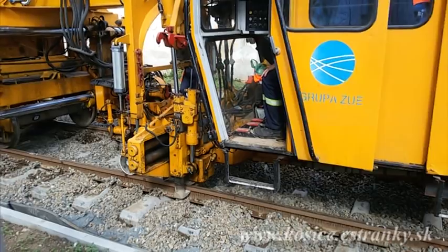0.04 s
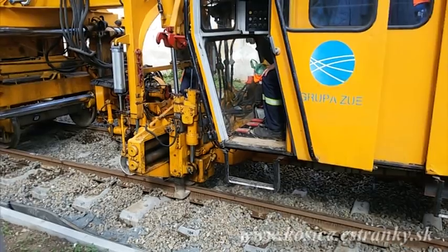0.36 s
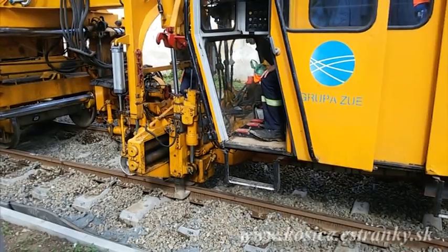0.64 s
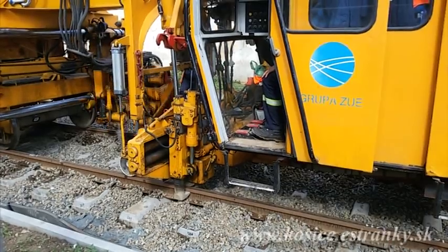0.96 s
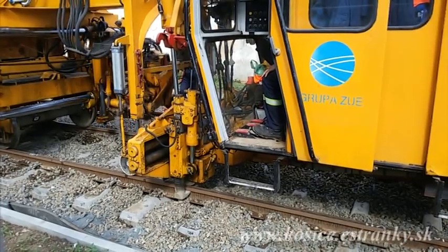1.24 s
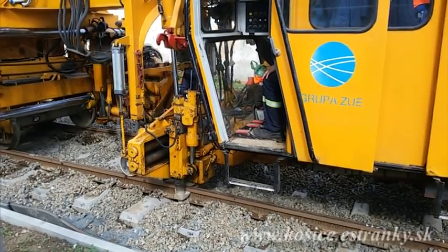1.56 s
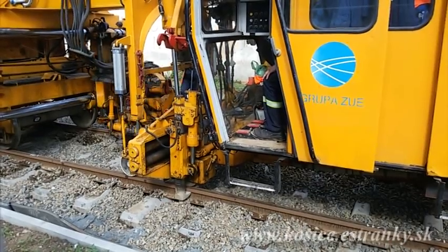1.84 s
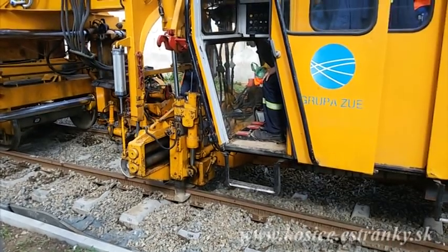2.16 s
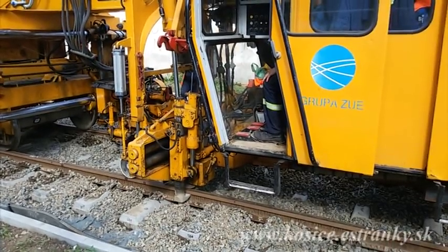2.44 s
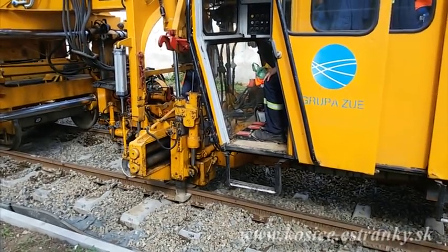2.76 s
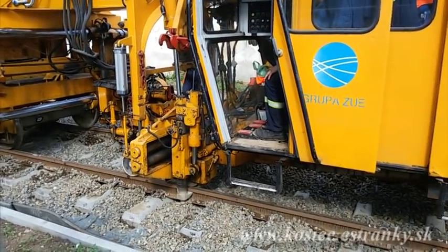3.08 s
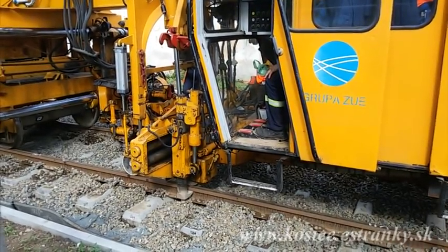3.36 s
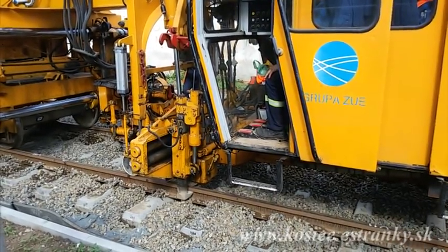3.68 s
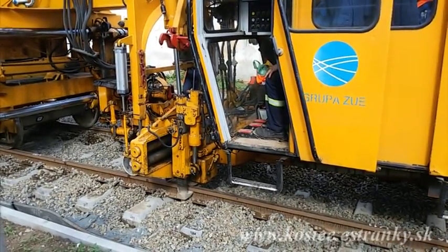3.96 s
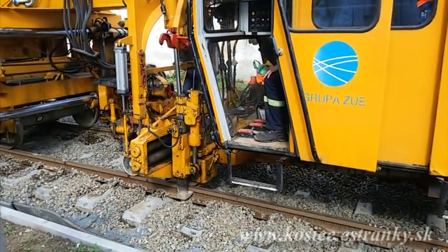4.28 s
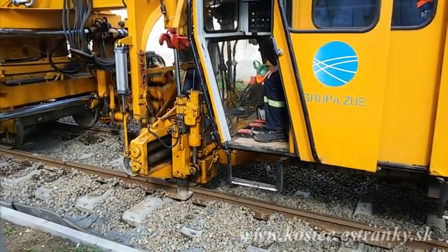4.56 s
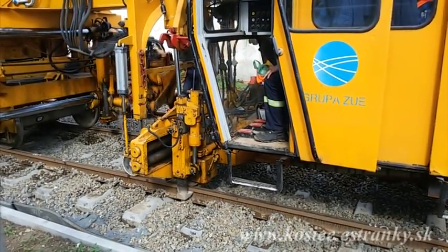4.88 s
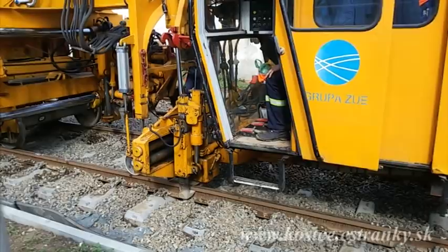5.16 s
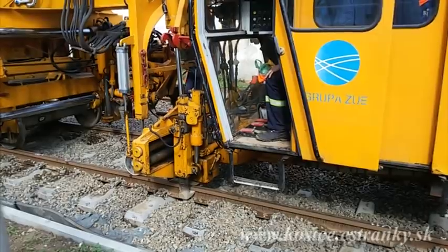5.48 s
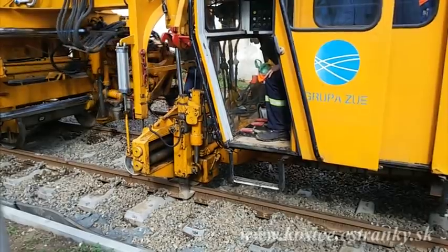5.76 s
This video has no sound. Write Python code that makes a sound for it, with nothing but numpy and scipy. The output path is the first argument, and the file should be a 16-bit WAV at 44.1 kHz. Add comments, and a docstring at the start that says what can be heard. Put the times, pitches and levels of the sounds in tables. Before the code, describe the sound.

A diesel engine drones and rattles without a break, heard from close by on open railway track. Twice the machine drives its shaking tines into the stone bed with a gritty thud, followed by churning gravel, steel scraping, fast metallic chatter and a pump whine as the engine sags slightly. Between the two digs come a low vibrating hum and a rush of hissing oil with a faint whistle.

```python
"""Open railway track, close beside a working ballast tamper; the sound fades in.
The diesel drones at governed speed and sags when the hydraulic pump takes load and whines.
Lifted clear, the vibrating tines hum; twice they plunge in with a thud, then crunch and scrape
through the stones. Loose linkage clinks with every shake, the heavy frame rumbles, and oil hisses
in the valves, most strongly as it drives the unit on to the next sleeper."""
import sys
import numpy as np
from scipy import signal
from scipy.fft import rfft, irfft
from scipy.io import wavfile

SR = 44100
rng = np.random.default_rng(int(sys.argv[2]) if len(sys.argv) > 2 else 0)


def store_wav(level_fs):
    """Save 16-bit WAV to argv[1]."""
    pcm = np.round(np.clip(np.atleast_2d(level_fs), -1, 1) * 32767)
    wavfile.write(sys.argv[1], SR, pcm.T.astype(np.int16))


N = 265482
T = np.arange(N) / SR

# the tines are down in the stone bed: plunge_s, clear_s, thud_db
DIGS = [(0.713, 2.43, -18), (4.30, 6.75, -19)]


def amp(db):
    """Decibels to gain."""
    return 10 ** (np.asarray(db) / 20)


def unit(x):
    """Scales to rms 1."""
    return x / np.sqrt(np.mean(x ** 2) + 1e-20)


def curve(rows):
    """An automation curve through (time, value) points."""
    return np.interp(T, *np.transpose(rows))


def drift(hz):
    """A slow random wander of rms 1, up to about hz."""
    f = np.fft.rfftfreq(N, 1 / SR)
    return unit(irfft(rfft(rng.standard_normal(N)) * np.exp(-(f / hz) ** 2), N))


def colour(x, spectrum, size=4096):
    """Minimum-phase EQ, so that clicks keep their attack; the result has rms 1."""
    hz, db = np.transpose(spectrum)
    f = abs(np.fft.fftfreq(size, 1 / SR))
    log_gain = np.log(amp(np.interp(np.log(f + 1), np.log(hz), db)))
    taps = np.fft.ifft(np.exp(signal.hilbert(log_gain).conj())).real
    return unit(signal.oaconvolve(x, taps)[:N])


def tones(turns, orders, waver, waver_hz):
    """Partials at multiples of a rotation, each wavering in strength and phase."""
    return sum(amp(db) * np.sqrt(2) * (1 + waver * drift(waver_hz))
               * np.cos(2 * np.pi * (k * turns + rng.random()) + waver * drift(waver_hz))
               for k, db in orders)


def strokes(turns, length, depth):
    """A gain that jumps once a turn and dies away within a share of it."""
    return unit(1 + depth * np.exp(-(turns % 1) / length))


def knocks(per_s, spread_db):
    """Random clicks, mostly small and a few large."""
    size = amp(spread_db * np.minimum(rng.exponential(1, N), 4))
    return unit(size * rng.choice([-1., 1.], N) * (rng.random(N) < per_s / SR))


def jolts(per_s, fade_s, depth):
    """A gain of irregular jumps, each settling back to 1."""
    hits = rng.exponential(1, N) * (rng.random(N) < per_s / SR)
    return 1 + depth * signal.lfilter([1], [1, -np.exp(-1 / (fade_s * SR))], hits)


def arch(start_s, end_s, skew=1):
    """A half-sine swell; a skew below 1 brings its peak forward."""
    return np.sin(np.pi * np.clip((T - start_s) / (end_s - start_s), 0, 1) ** skew)


def stage(rows, attack_s, release_s):
    """A stage of the work cycle: its gate (0-1), and a gated ramp from its start to its end."""
    on, ramp = np.zeros(N), np.zeros(N)
    for start, end, *_ in rows:
        gate = np.clip(np.minimum((T - start) / attack_s, (end - T) / release_s), 0, 1)
        on += gate
        ramp += gate * (T - start) / (end - start)
    return on, ramp


def exhaust(firings, level_db, pressure, swell_db=2.5):
    """The firing note swells with pump pressure, over side tones from cylinders of unequal strength."""
    # side tones: firing_multiple, level_db
    side_orders = [(0.75, -21.5), (1.25, -21), (1.75, -14), (2, -5.5), (2.25, -26.5), (2.75, -15),
                   (3, -16.5), (3.75, -14), (4, -18.5)]
    note = amp(swell_db * pressure) * tones(firings, [(1, 0.0046)], waver=0.039, waver_hz=14)
    sides = tones(firings, side_orders, waver=0.07, waver_hz=5)
    return amp(level_db) * (note + sides)


def engine_rattle(firings, level_db, cylinders=4):
    """Each firing jolts the block; one of the cylinders knocks harder, and loose parts tick."""
    # tone of the engine block: freq_hz, gain_db
    block_eq = [(300, -24.5), (700, -15.5), (1500, -2.5), (2300, -3), (2900, 0.5), (3500, 0.5),
                (3900, -5.5), (4350, -2.5), (4800, -12), (7000, -21), (11000, -54)]
    pulse = strokes(firings, length=.3, depth=0.13)
    pulse *= strokes(firings / cylinders, length=0.13, depth=0.074)
    pulse *= jolts(per_s=110, fade_s=0.0054, depth=0.24)
    return amp(level_db) * colour(pulse * knocks(per_s=20000, spread_db=1.5), block_eq)


def valve_gear(firings, level_db, cylinders=4, size=2048):
    """Valves and injectors repeat the same ticks every engine cycle, giving the roar a fine buzz."""
    # tone of the valve gear: freq_hz, gain_db
    valve_eq = [(150, -25), (280, -9), (400, -11.5), (500, -13), (600, -10.5), (700, -2), (1000, -5.5),
                (1300, -4.5), (1700, 3), (1900, -5.5), (2400, -13), (4000, -12), (7000, -35)]
    phase = np.arange(size) / size
    pattern = rng.standard_normal(size) * strokes(cylinders * phase, length=0.22, depth=1.1)
    ticks = np.interp(firings / cylinders, phase, pattern, period=1)
    return amp(level_db) * colour(ticks, valve_eq)


def oil_hiss(firings, level_db, cylinders=4):
    """Oil rushes through the valves, pulsing slightly with the engine."""
    # tone of the rushing oil: freq_hz, gain_db
    oil_eq = [(2000, -16.5), (4000, -0.5), (4900, -3), (5450, 2.5), (6100, -4.5), (7000, -9.5), (7800, -10),
              (8400, -13.5), (9200, -18.5), (10200, -21.5)]
    pulse = strokes(firings, length=.3, depth=0.057)
    pulse *= strokes(firings / cylinders, length=0.52, depth=0.29)
    flow = rng.standard_normal(N) * pulse * jolts(per_s=120, fade_s=0.017, depth=0.12)
    return amp(level_db) * colour(flow, oil_eq)


def valve_whistles(width_hz=44):
    """Narrow, fuzzy bands of hiss swell and fade as the oil valves open and close."""
    # valve openings: start_s, end_s, pitch_hz, level_db
    whistles = [(0.3, 0.85, 4300, -32), (1.306, 2.2, 3260, -31), (3.5, 4.45, 4330, -31.5)]
    out = np.zeros(N)
    for start, end, hz, db in whistles:
        angle = 2 * np.pi * hz * T
        band = drift(width_hz) * np.cos(angle) + drift(width_hz) * np.sin(angle)
        out += amp(db) * arch(start, end) * band
    return out


def tine_hum(shakes, free_db, churn_db, damping=0.99):
    """The arms hum when free; any touch of the ballast damps them, and higher tones rise in the frame."""
    # partials swinging free, and pressed into the stones: shake_multiple, level_db
    free_orders = [(3, -10), (4, 3), (5, -4), (6, -14.5), (7, -10), (9, -21)]
    pressed_orders = [(2, -16), (6, -11.5), (8, -10), (9, -6), (10, -6.5), (12, -8), (13, -5), (17, -11.5),
                      (21, -8)]
    touching, _ = stage(DIGS, attack_s=0.094, release_s=0.42)
    free = amp(free_db) * tones(shakes, free_orders, waver=0.12, waver_hz=4.6)
    pressed = amp(churn_db - 15) * tones(shakes, pressed_orders, waver=0.41, waver_hz=6.1)
    return (1 - damping * touching) * free + pressed


def frame_rumble(shakes, level_db):
    """Dull blows travel into the heavy frame with each shake."""
    # tone of the frame: freq_hz, gain_db
    frame_eq = [(20, -44), (45, -16), (65, -15), (110, -2), (180, -4), (240, 0), (320, 2.5), (375, -4),
                (420, -5), (490, -14.5), (900, -37.5), (3000, -60)]
    blows = knocks(per_s=2000, spread_db=3.0) * strokes(shakes, length=.3, depth=0.2)
    return amp(level_db) * colour(blows, frame_eq)


def ballast_churn(shakes, level_db, load):
    """Stones grind in clumps at each push of the tines; the packed bed growls only under load."""
    # tone of loose stones, and of those packed deep under the sleeper: freq_hz, gain_db
    loose_eq = [(150, -20.5), (410, -14), (500, -9), (610, -4.5), (715, 3.5), (800, 0), (900, 2.5),
                (1100, 0), (1320, -1.5), (1900, 0.5), (2400, -14.5), (4000, -11.5), (9000, -52)]
    packed_eq = [(150, -27.5), (300, -18.5), (400, 0.5), (470, -6.5), (580, -4.5), (750, -13), (2000, -48)]
    clumps = strokes(shakes + 0.1 * drift(10), length=0.16, depth=0.2 + 0.084 * load)
    clumps *= jolts(per_s=110, fade_s=0.0021, depth=0.26)
    grind = colour(clumps * amp(.5 * drift(40)) * knocks(per_s=14000, spread_db=2.0), loose_eq)
    growl = colour(clumps * knocks(per_s=6000, spread_db=2.5), packed_eq)
    return amp(level_db + .5 * drift(4.8)) * (grind + amp(-12.5) * load * growl)


def steel_clatter(shakes, level_db, load):
    """Tines and loose linkage are struck in bursts, harder under load, and ring briefly."""
    # resonances of the tamping unit: pitch_hz, width_hz, level_db
    modes = [(1342, 110, -8.5), (1540, 116, -4), (1705, 145, -3), (1803, 75, -9), (2060, 67, -10.5),
             (3160, 430, -16)]
    bursts = strokes(shakes + 0.057 * drift(17), length=0.21, depth=0.45 + 0.48 * load)
    bursts *= jolts(per_s=92, fade_s=0.0014, depth=0.23)
    t = T[:SR // 20]
    out = np.zeros(N)
    for hz, width, db in modes:
        ring = amp(db) * np.sqrt(width) * np.exp(-np.pi * width * t) * np.sin(2 * np.pi * hz * t)
        out += signal.oaconvolve(bursts * knocks(per_s=8000, spread_db=1.5), ring)[:N]
    return amp(level_db) * unit(out)


def linkage_chatter(shakes, pitch_hz=1713, pitch_spread=0.035, backswing_db=-4.5):
    """A loose link hits its stop at both ends of each shake, each clink at a slightly different pitch."""
    # fader ride of the clinks: time_s, level_db
    fader = [(0.55, -34), (0.8, -22), (1.1, -22.5), (1.9, -22), (2.3, -23.5), (2.55, -24), (2.65, -22.5),
             (3.22, -23), (3.42, -36), (3.7, -23), (4.6, -21), (5.6, -25.5), (5.75, -27)]
    attack_s, decay_s = 0.00068, 0.0075
    swings = np.floor(2 * shakes + 0.1187 * drift(19.97))
    hits = np.flatnonzero(np.diff(swings) > 0)
    t = T[:SR // 20]
    envelope = (1 - np.exp(-t / attack_s)) * np.exp(-t / decay_s)
    out = np.zeros(N + len(t))
    for at, (detune, force_db) in zip(hits, rng.standard_normal((len(hits), 2))):
        hz = pitch_hz * (1 + pitch_spread * detune)
        gain = amp(force_db + backswing_db * (swings[at] % 2))
        out[at:at + len(t)] += gain * envelope * np.sin(2 * np.pi * hz * t)
    return amp(curve(fader)) * unit(out[:N])


def plunge(attack_s=0.011, fade_s=0.1):
    """A gritty thud as the tines break into the stones."""
    # tone of the impact: freq_hz, gain_db
    thud_eq = [(30, -48), (70, -2), (110, -12), (190, -0.5), (300, 4.5), (400, -3), (550, -11), (900, 10),
               (1300, -24), (4000, -35)]
    push = np.zeros(N)
    for start, _, db in DIGS:
        age = np.maximum(T - start, 0)
        push += amp(db) * np.minimum(age / attack_s, 1) * np.exp(-(age / fade_s) ** 2)
    return push * colour(knocks(per_s=2200, spread_db=1.5), thud_eq)


def stone_bursts(shakes, cues, spectrum):
    """Short rushes of coarse grains that swell quickly, rattle with each push of the tines and die."""
    swell = sum(amp(db) * np.sqrt(abs(arch(start, start + length, skew=0.54)))
                for start, length, db in cues)
    pushes = strokes(shakes + 0.076 * drift(18), length=0.34, depth=1.2)
    grains = knocks(per_s=1800, spread_db=4.5) * pushes * jolts(per_s=140, fade_s=0.0055, depth=0.41)
    return swell * colour(grains, spectrum)


def stone_crunch(shakes):
    """Pockets of stones give way with a crunch."""
    # collapsing pockets: start_s, length_s, level_db
    crunches = [(0.714, 0.18, -21.5), (1.146, .14, -23), (1.373, 0.13, -19), (4.31, 0.29, -23),
                (4.725, 0.18, -24.5), (5.2, 0.3, -24), (5.7, 0.15, -27.5)]
    # their tone: freq_hz, gain_db
    crunch_eq = [(400, -32), (620, -10), (740, 3), (900, 9.5), (1020, -6), (1300, -5.5), (3000, -43)]
    return stone_bursts(shakes, crunches, crunch_eq)


def lurches(width_s=0.092):
    """The unit lurches, briefly lifting or ducking the rumble, the churn and the clatter (in dB)."""
    # lurches: peak_s, rumble_db, churn_db, clatter_db
    accents = [(0.78, 5, -1, 3.5), (1.46, 3, 2.5, 1), (1.87, 4.5, 1.5, 2.5), (2.12, 6, 1, 0.5),
               (2.75, 3, 3, -3), (3.05, 3, 0.5, -0.5), (3.25, 0, -1.5, -2), (4.38, 5, 1.5, 0),
               (5.3, -3, -2, 2), (5.72, 3, 0, -3)]
    return sum(np.outer(offsets_db, np.exp(-((T - s) / width_s) ** 2)) for s, *offsets_db in accents)


def panel_drone(shakes):
    """Frame panels resonate with single overtones of the vibrator as the load on the frame shifts."""
    # panel resonances: start_s, end_s, shake_multiple, level_db
    panels = [(0.793, 1.316, 12, -28), (1.22, 1.646, 8, -30), (2.85, 3.2, 9, -31), (2.85, 3.752, 10, -31.5),
              (4.35, 4.948, 12, -33.5), (4.92, 5.78, 8, -26.5), (5.1, 5.604, 9, -33), (5.498, 6.2, 11, -34),
              (5.702, 6.2, 12, -28.5)]
    return sum(amp(db) * arch(start, end) * tones(shakes, [(k, 0)], waver=0.22, waver_hz=14)
               for start, end, k, db in panels)


def pump_whine(firings, pumping, teeth_per_firing=14.5):
    """Engine-driven gear teeth whine under load, growing through each stroke and dropping near its end."""
    # partials of the gears: tooth_rate_multiple, level_db
    gear_orders = [(2, -8.5), (3, -1)]
    # fader ride of the whine: time_s, level_db
    fader = [(1.4, -31), (1.75, -28.5), (2.05, -26.5), (2.2, -24.5), (2.52, -28), (2.62, -32), (2.75, -40),
             (4.9, -39), (5.3, -33), (5.62, -28.5), (5.87, -25.5), (6.02, -34)]
    whine = tones(teeth_per_firing * firings, gear_orders, waver=0.21, waver_hz=16)
    return pumping * amp(curve(fader)) * whine


def tine_scrape(shakes):
    """The tines scrape as they squeeze the stones together."""
    # squeezes: start_s, length_s, level_db
    scrapes = [(1.396, 0.26, -19.5), (4.74, 0.39, -24), (5.17, 0.4, -21), (5.547, 0.12, -21.5)]
    # their tone: freq_hz, gain_db
    scrape_eq = [(600, -38), (1000, -9), (1200, -4.5), (1350, 8.5), (1470, 2), (1620, 1.5), (1850, -5),
                 (2300, -11), (5000, -73)]
    return stone_bursts(shakes, scrapes, scrape_eq)


def scene():
    """The cycle of dig, pump stroke and advance rides the mix; diesel and vibrator set the pulse."""
    # the pump works against pressure: start_s, end_s
    pump_strokes = [(1.32, 2.78), (4.79, 6.3)]
    # oil drives the unit on to the next sleeper: start_s, end_s
    advances = [(-0.55, 0.77), (3, 4.35)]
    # speed of the tine vibrator: time_s, rate_hz
    shake_rate = [(0.4, 32.62), (0.8, 33.92), (1.8, 33.38), (2.4, 32.39), (2.9, 31.92), (3.8, 33.27),
                  (4.6, 33.22), (5.1, 34)]
    # each layer's resting level and its offsets in the cycle: rest_db, dig_db, pump_db, advance_db
    exhaust_mix = (-22.5, -3, 1.5, 2.2)
    rattle_mix = (-19.5, -1.04, 0.4, 2)
    valve_mix = (-24, -1.5, 0.5, 4)
    hiss_mix = (-25.5, -2, -1.36, 3)
    hum_mix = (-28, -15, 1, -3.5)
    rumble_mix = (-31.5, 0.8, 2, 0)
    churn_mix = (-23, 5.5, -0.27, 4)
    clatter_mix = (-22, 3, -1.1, 3.5)
    governed_hz, load_sag_hz, pressure_sag_hz = 84.37, 2.53, 0.597  # diesel firing rate

    load, _ = stage(DIGS, attack_s=0.083, release_s=0.8)
    pumping, pressure = stage(pump_strokes, attack_s=.22, release_s=.16)
    _, advance = stage(advances, attack_s=0.17, release_s=0.13)
    speed = advance ** 2  # the unit gathers speed through each advance

    def level(rest_db, dig_db, pump_db, advance_db):
        """A layer's level in dB through the cycle."""
        return rest_db + dig_db * load + pump_db * pumping + advance_db * speed

    firings = np.cumsum(governed_hz - load_sag_hz * pumping - pressure_sag_hz * pressure ** 4) / SR
    shakes = np.cumsum(curve(shake_rate)) / SR
    rumble_lurch_db, churn_lurch_db, clatter_lurch_db = lurches()
    churn_db = level(*churn_mix) + churn_lurch_db

    diesel = exhaust(firings, level(*exhaust_mix), pressure)
    diesel += engine_rattle(firings, level(*rattle_mix)) + valve_gear(firings, level(*valve_mix))
    hydraulics = pump_whine(firings, pumping) + oil_hiss(firings, level(*hiss_mix)) + valve_whistles()
    frame = tine_hum(shakes, level(*hum_mix), churn_db) + panel_drone(shakes)
    frame += frame_rumble(shakes, level(*rumble_mix) + rumble_lurch_db)
    tamping = plunge() + ballast_churn(shakes, churn_db, load)
    tamping += steel_clatter(shakes, level(*clatter_mix) + clatter_lurch_db, load)
    tamping += stone_crunch(shakes) + tine_scrape(shakes) + linkage_chatter(shakes)
    return (diesel + hydraulics + frame + tamping)[None]


def record(dry):
    """The microphone thins the deepest bass; then a fade-in, a soft peak limiter and a high cut."""
    low_cut_hz, high_cut_hz, ceiling = 48, 9900, 0.93
    thinned = signal.sosfilt(signal.butter(3, low_cut_hz, "highpass", fs=SR, output="sos"), dry)
    faded = thinned * np.interp(T, [.337, .342, .45, .62], [0, .025, .37, 1])
    limited = faded / (1 + (faded / ceiling) ** 8) ** (1 / 8)
    high_cut = signal.firwin(255, high_cut_hz, window=("kaiser", 9), fs=SR)
    return signal.oaconvolve(limited, high_cut[None], "same")


dry = scene()
out = record(dry)
store_wav(out)
```